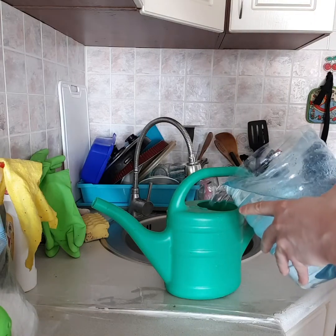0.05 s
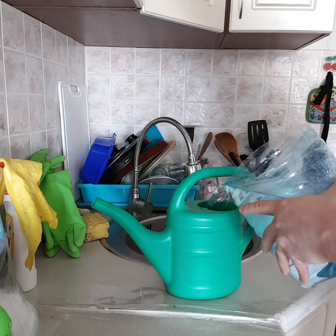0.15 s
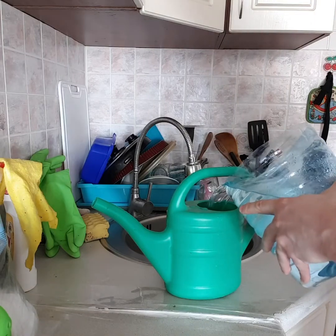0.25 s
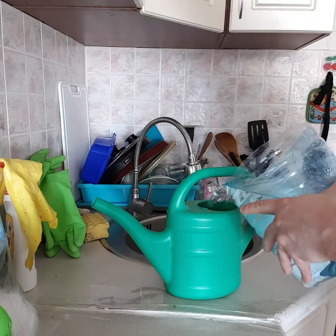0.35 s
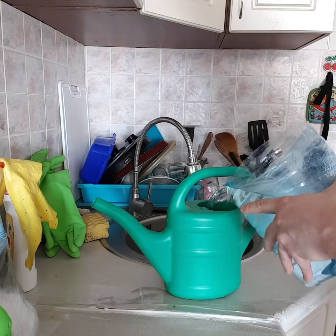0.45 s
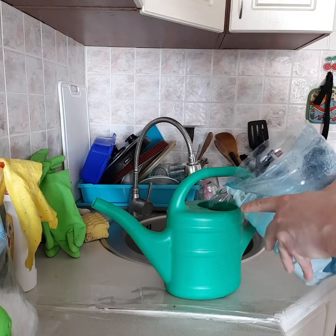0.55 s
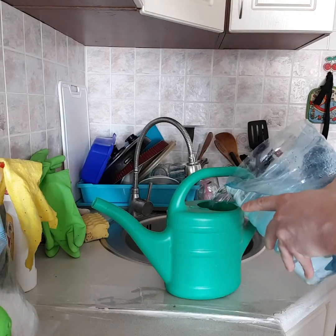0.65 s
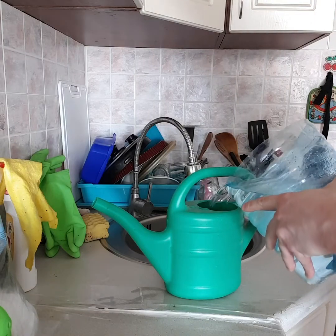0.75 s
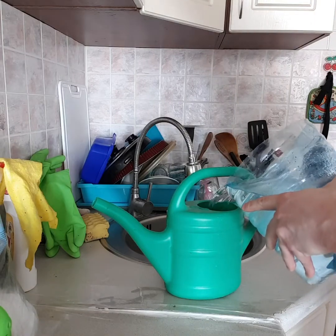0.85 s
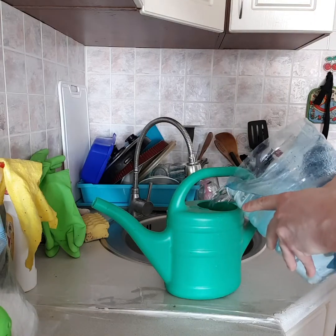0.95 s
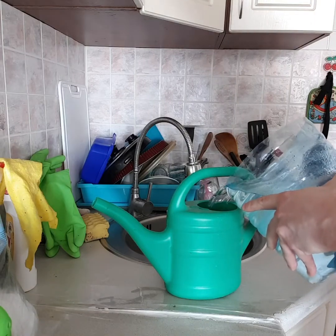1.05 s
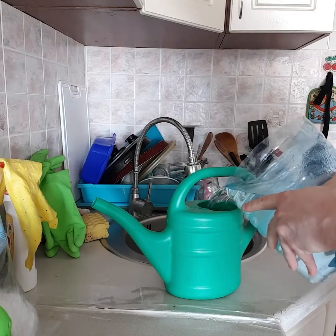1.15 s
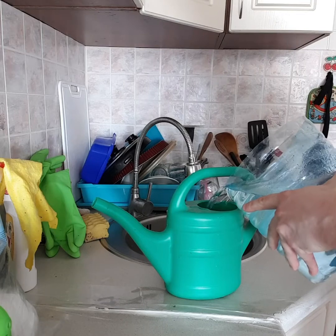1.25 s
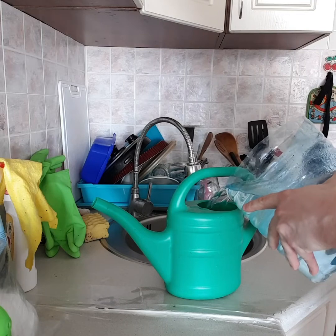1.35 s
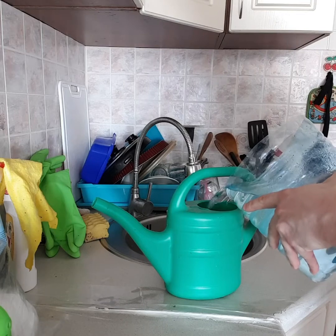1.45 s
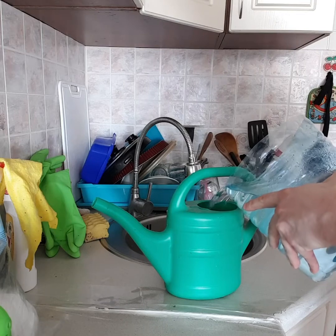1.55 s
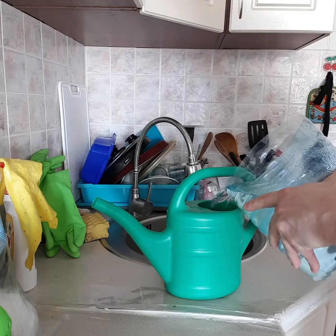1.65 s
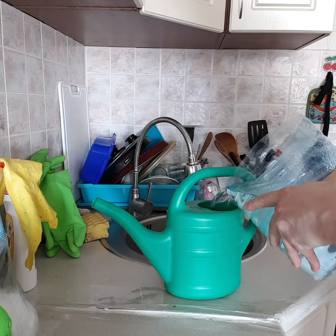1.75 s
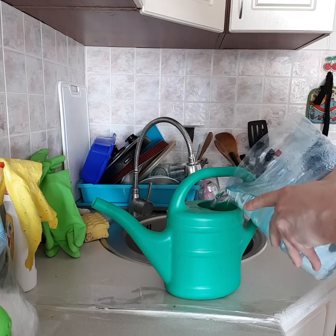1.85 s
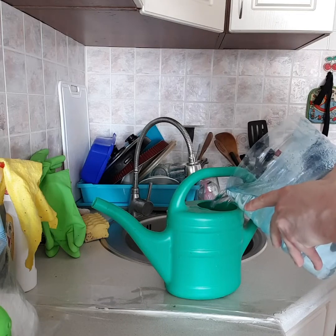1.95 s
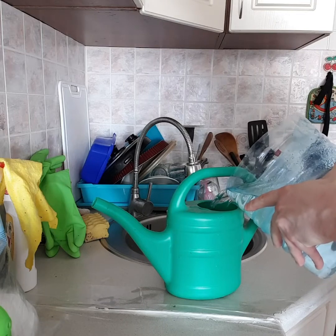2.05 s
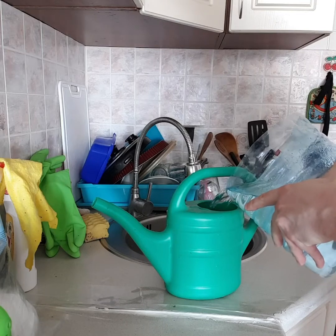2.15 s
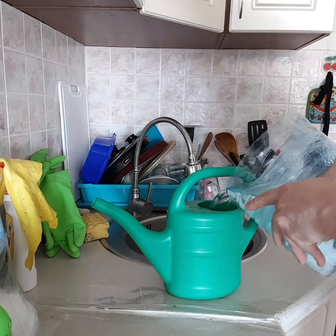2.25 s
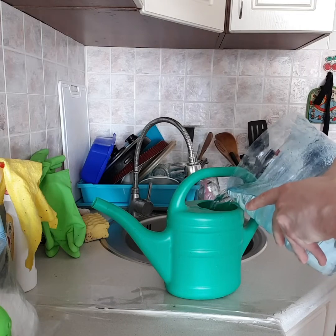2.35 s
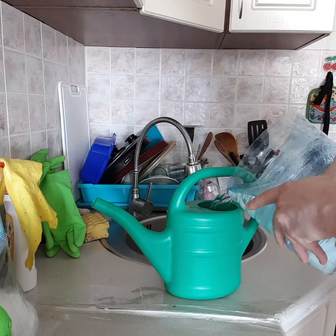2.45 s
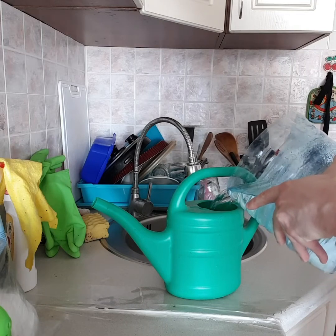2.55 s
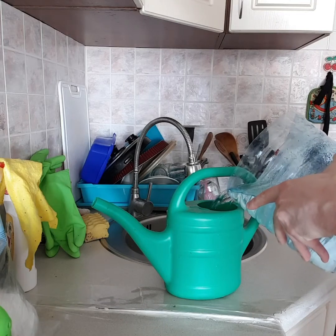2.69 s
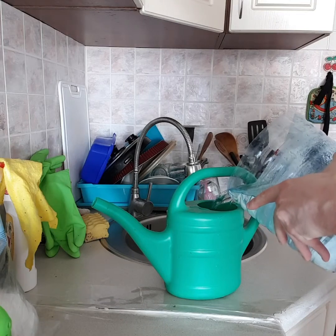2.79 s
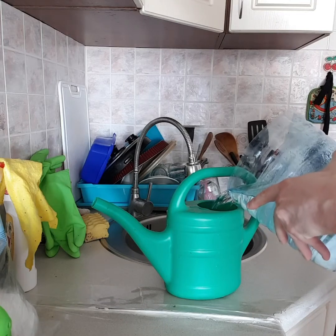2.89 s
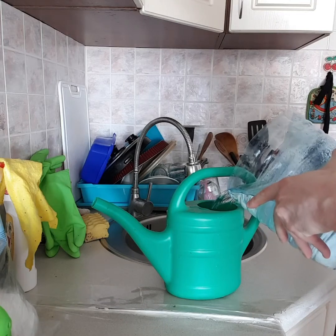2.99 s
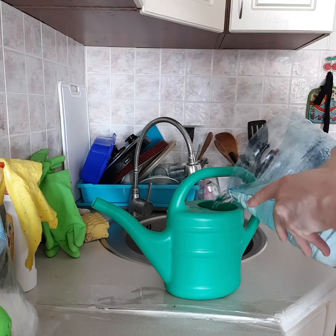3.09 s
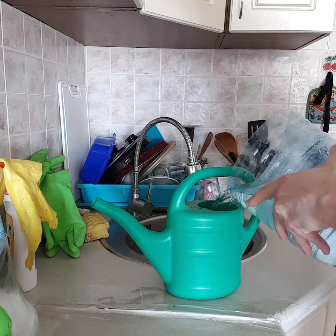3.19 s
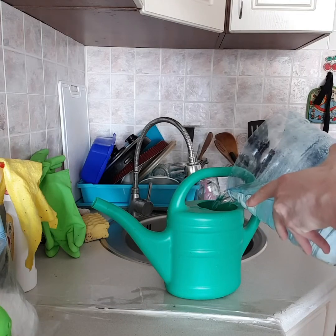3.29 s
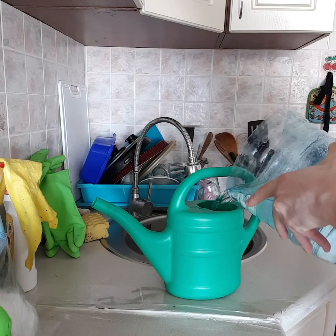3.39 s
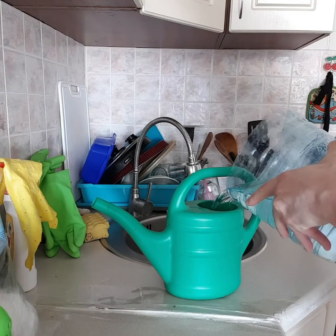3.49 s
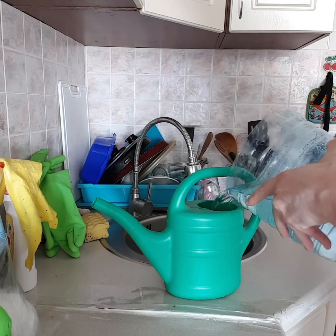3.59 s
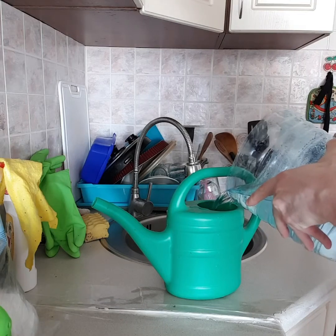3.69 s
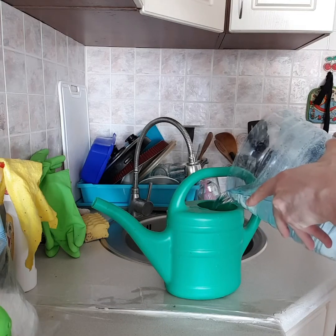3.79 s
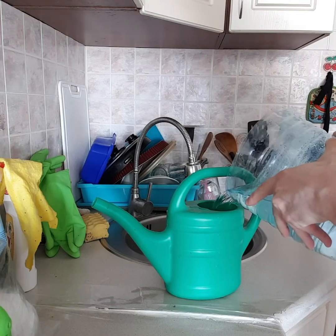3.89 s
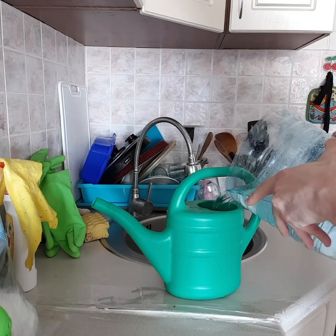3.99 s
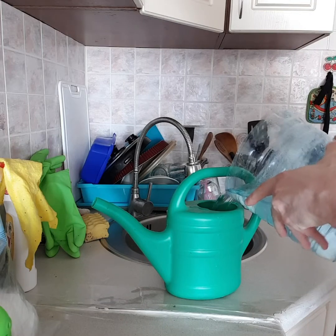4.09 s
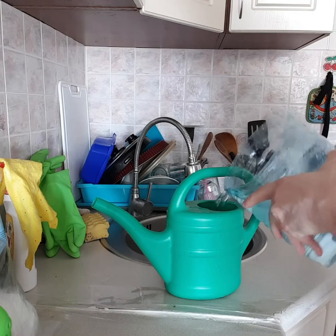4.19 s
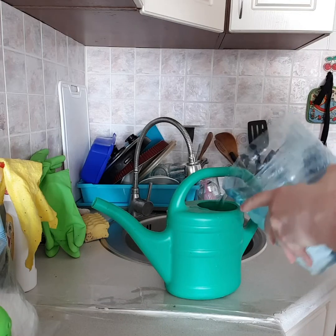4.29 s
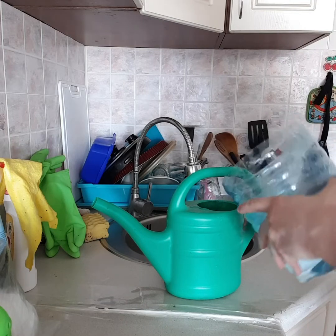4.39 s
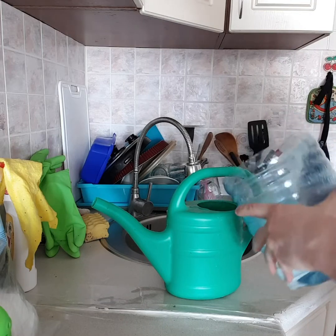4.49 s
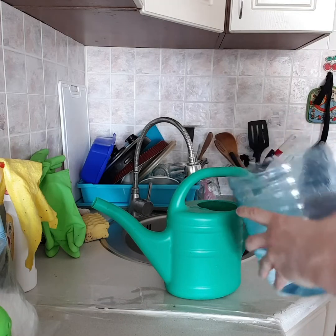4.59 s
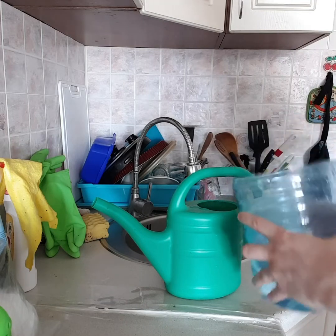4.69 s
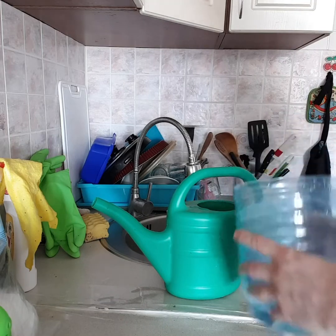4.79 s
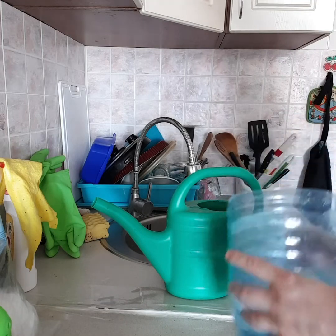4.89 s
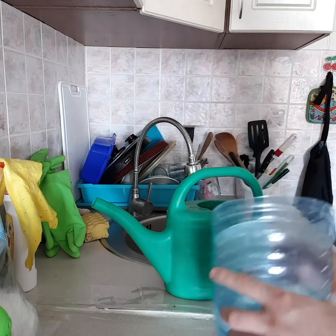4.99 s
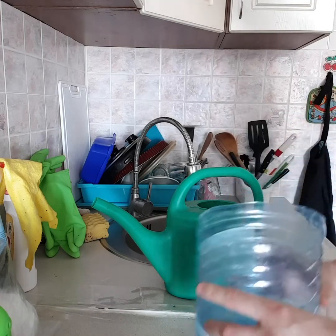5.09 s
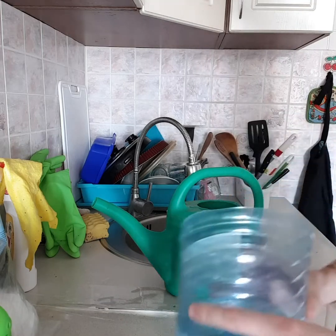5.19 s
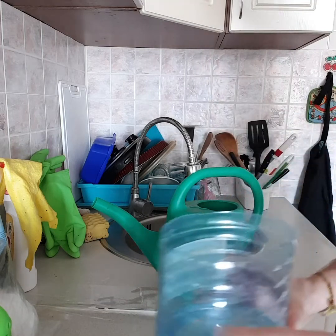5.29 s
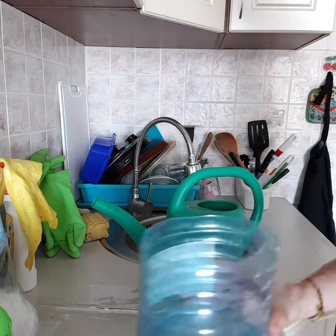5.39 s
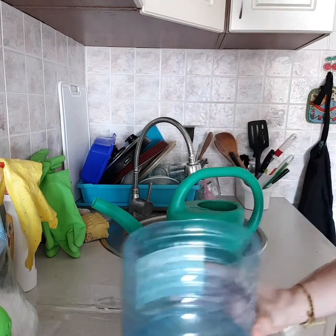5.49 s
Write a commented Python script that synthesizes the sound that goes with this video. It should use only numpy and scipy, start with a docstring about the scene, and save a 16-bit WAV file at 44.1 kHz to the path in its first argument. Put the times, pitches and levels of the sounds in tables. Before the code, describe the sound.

Close stereo sound in a small, hard tiled kitchen with a very faint hollow room tone. Water is already running from a big thin plastic bottle into a plastic watering can: lively bubbling, fine spray, plopping drops and a low hollow resonance. Dry plastic crackles snap at about 0.65 and 0.9 seconds, and a large round gulp sounds near 0.95. The stream then weakens; at about 1.46 the bottle wall pops back, sharp and loud, with small crackles around 1.6 to 1.8. From 2 to 3.2 seconds it is an uneven trickle, with separate drops splashing on water and plastic. The flow stops near 3.4. A bright, ringing drip lands at 3.75, soft lapping follows, and a faint drip comes near 4.3. At about 4.4 the bottle rubs, squeaks slightly and bumps down with a low thud, double knock and small tap. Faint plastic rustles fade after 4.6, leaving near silence.

```python
"""Filling a watering can

Water runs from a big plastic bottle into a plastic can in a tiled kitchen: noise through the can's resonances
and swarms of rising bubbles follow a flow that thins to a trickle; gulps and single drips come at set moments.
The thin bottle crackles and drops splash on plastic, both as noise bursts; the bottle's wall pops back
and it is set down with a thud, both damped modes with noise."""
import sys
import numpy as np
from scipy import signal
from scipy.fft import rfft, irfft, next_fast_len
from scipy.io import wavfile
from scipy.ndimage import map_coordinates

SR = 44100
rng = np.random.default_rng(int(sys.argv[2]) if len(sys.argv) > 2 else 0)


def dump(signal):
    """Clip the signal to [-1, 1] and save it as 16-bit WAV at the path in sys.argv[1]."""
    limited = np.clip(np.atleast_2d(signal).T, -1, 1)
    pcm = np.round(limited * 32767).astype(np.int16)
    wavfile.write(sys.argv[1], SR, pcm)


N = 244314
T = np.arange(SR // 3) / SR  # time within one short sound, s


def amp(db):
    """Decibels to gain."""
    return 10 ** (np.asarray(db) / 20)


def unit(x):
    """Scale to rms 1."""
    return x / np.sqrt(np.mean(x ** 2) + 1e-20)


def along(points, hz):
    """Read (hz, value) points on a log frequency axis."""
    point_hz, value = np.transpose(points)
    return np.interp(np.log(hz + 1), np.log(point_hz + 1), value)


def around(hz, band):
    """Move a spectrum shape to a centre frequency."""
    return [(share * hz, level_db) for share, level_db in band]


def filtered(x, response):
    """Multiply the spectrum of x by a response of frequency."""
    n = x.shape[-1]
    padded = next_fast_len(n + 8192)
    spectrum = rfft(x, padded) * response(np.fft.rfftfreq(padded, 1 / SR))
    return irfft(spectrum, padded)[..., :n]


def coloured(x, spectrum):
    """Give x a spectrum, at rms 1."""
    return unit(filtered(x, lambda hz: amp(along(spectrum, hz))))


def resonance(hz, centre_hz, width_hz):
    """Second-order bandpass, peak gain 1."""
    damping = 1j * hz * width_hz
    return damping / (centre_hz ** 2 - hz ** 2 + damping)


def resonant(x, peaks):
    """Pass x through parallel resonances, each two equal stages of twice the listed width, at rms 1."""
    def response(hz):
        return sum(amp(db) * resonance(hz, centre, 2 * width) ** 2 for centre, width, db in peaks)
    return unit(filtered(x, response))


# left-right correlation of diffuse sound: hz, correlation
LEFT_RIGHT_CORRELATION = [(100, 0.99), (250, 0.9), (500, 0.42), (900, 0.14), (2000, 0.098), (10000, .02)]


def pair(size):
    """Noise at two microphones: alike in the bass, nearly unrelated in the treble."""
    def mid_side(hz):
        half_angle = np.arccos(np.clip(along(LEFT_RIGHT_CORRELATION, hz), -1, 1)) / 2
        return np.array([np.cos(half_angle), np.sin(half_angle)])
    mid, side = filtered(rng.standard_normal((2, size)), mid_side)
    return np.array([mid + side, mid - side])


def wobble(knots_per_s):
    """Smooth random curve through random knots."""
    knots = rng.standard_normal(1024)
    return map_coordinates(knots, [np.arange(N) * knots_per_s / SR], mode="wrap")


def fade(t, t60_s):
    """Exponential decay by 60 dB in t60_s."""
    return np.exp(-np.log(1000) * t / max(t60_s, 1e-4))


def swell_at(s, sigma_s):
    """Gaussian rise and fall around time s."""
    return np.exp(-((np.arange(N) / SR - s) / sigma_s) ** 2 / 2)


def add(track, s, sound):
    """Mix a sound in at time s."""
    start = max(round(s * SR), 0)
    track[:, start:start + sound.shape[1]] += sound[:, :N - start]


# late decay of the room: hz, t60_s
ROOM_DECAY = [(100, 0.71), (500, 0.47), (2000, 0.38), (6000, 0.4), (15000, 0.43)]
RIGHT_LAG_S = 0.00017  # direct sound reaches the left microphone first


def kitchen(x, wet_db):
    """Direct sound plus a diffuse answer from tiles and cupboards: decaying noise, faster in some bands."""
    hz, t, noise = signal.stft(pair(size=SR // 2), SR, nperseg=256)
    decay = np.exp(-np.log(1000) * t / along(ROOM_DECAY, hz)[:, None])
    tail = signal.istft(noise * decay, SR, nperseg=256)[1]
    t = np.arange(tail.shape[1]) / SR
    tail *= (1 - np.exp(-t / 0.00088)) * (1 + 2 * fade(t, t60_s=0.024))  # near walls answer first and strongest
    tail *= amp(wet_db) / np.linalg.norm(tail[0])
    tail[[0, 1], [0, round(RIGHT_LAG_S * SR)]] += 1  # direct sound
    return signal.fftconvolve(x[None], tail, axes=1) / np.sqrt(1 + amp(2 * wet_db))


def burst(spectrum, t60_s, rise_s):
    """Puff of coloured noise that swells, then dies."""
    shape = (1 - np.exp(-T / max(rise_s, 1e-4))) * fade(np.maximum(T - rise_s, 0), t60_s)
    return coloured(rng.standard_normal(len(T)), spectrum) * shape


def ring(modes):
    """Damped modes struck together, with alternating sign."""
    total = np.zeros(len(T))
    for k, (hz, db, t60_s) in enumerate(modes):
        total += (-1) ** k * amp(db) * fade(T, t60_s) * np.sin(2 * np.pi * hz * T)
    return total * (1 - np.exp(-T / 0.00038))  # soft onset


def bubble(t, hz, t60_s, rise):
    """A bubble rings and its pitch climbs as it nears the surface, by the share rise in t60_s."""
    u = t / t60_s
    return np.sin(2 * np.pi * hz * t * (1 + rise * u / 2)) * np.exp(-np.log(1000) * u) * (1 - np.exp(-2 * t * hz))


def swarm(count, low_hz, high_hz, cycles, scatter_db, crowd, size=SR // 90):
    """Bubbles of random pitch, most weak and a few strong; crowd sets how thickly they come, at an even level."""
    when, pitch = rng.random(count), rng.random(count)
    strength = rng.exponential(size=count)
    start = np.searchsorted(np.cumsum(crowd), when * crowd.sum())
    hz = low_hz * (high_hz / low_hz) ** pitch[:, None]
    strength_gain = amp(scatter_db * np.minimum(strength, 3.5)) / np.sqrt(crowd[start])
    height = hz * strength_gain[:, None]  # short-lived small bubbles are taller, for even energy over pitch
    k = np.arange(size)
    grains = height * bubble(k / SR, hz, cycles / hz, rise=0.17)
    return unit(np.bincount((start[:, None] + k).ravel(), grains.ravel(), N)[:N])


# higher notes of the can's air: centre_hz, width_hz, level_db
CAN_HIGH_NOTES = [(781, 19, 2.5), (940.4, 30, 5), (1272, 12, -0.5), (1634, 69, -3.5), (1756, 26, 1.5),
                  (2316, 30, -7.5)]


def in_can(x):
    """Sound made inside the can rings its air: resonances added to the direct sound."""
    def response(hz):
        return 1 + sum(amp(db) * resonance(hz, centre, width) for centre, width, db in CAN_HIGH_NOTES)
    return filtered(x, response)


def can_mouth(x):
    """The can's hollow note reaches the right microphone later and stronger."""
    return np.array([amp(-2.0) * x, amp(2.0) * np.roll(x, round(0.00075 * SR))])


# steady hush: hz, level_db
HUSH_SPECTRUM = [(15, -40), (25, -6), (59, -2.5), (140, 2.5), (523, -17.5), (741, -13), (945, 3.5),
                 (1710, -50), (2560, -28.5), (3530, -32), (4870, -55), (5880, -39), (15500, -27.5)]
# its hollow bands: centre_hz, width_hz, level_db
HOLLOW_BANDS = [(880, 264, -5), (5400, 690, -16.5)]


def room_tone():
    """Faint steady noise with a hollow colour."""
    hush = amp(-61.0) * coloured(pair(size=N), HUSH_SPECTRUM)
    return hush + amp(-72.5) * resonant(pair(size=N), HOLLOW_BANDS)


# wall popping back, modes: hz, level_db, t60_s
WALL_MODES = [(128, -23, .25), (175, -24, .14), (484, -5, .14), (526, 1, .12), (588, -5, .12),
              (670, -11, .12), (884, -6, .2), (1400, -6, .03), (2130, -2, .04), (3020, -11, .04)]
# its crack: hz, level_db
WALL_CRACK_SPECTRUM = [(80, -23), (170, 2.5), (330, -2), (560, 4), (750, 4), (1400, 5), (2250, 1),
                       (3300, -9), (5000, -18.5), (6500, -27.5), (13000, -35)]
# bottle meeting the counter, modes: hz, level_db, t60_s
COUNTER_MODES = [(122, -3, .11), (172, 3, .11), (250, 3, .1), (365, -3, .11), (420, 3, .17), (535, -1, .12),
                 (686, -3, .12), (950, -5, .08), (1510, -9, .12)]
# its noise bump: hz, level_db
COUNTER_BUMP_SPECTRUM = [(60, -22), (120, -8), (400, -1), (600, -4), (950, -4), (1600, -9), (2300, -16),
                         (3000, -36), (6000, -50)]
# bumps of the bottle: start_s, level_db
BOTTLE_BUMPS = [(1.819, -57.5), (4.4198, -37.5), (4.4405, -44.5), (4.498, -51.5), (4.869, -64.5)]
# bottle's side tapping something just after the thud, modes: hz, level_db, t60_s
TAP_MODES = [(455, 1, .25), (1570, 3, .09), (1800, 0, .08), (4230, -4, .02), (5200, -5, .025)]
# wet plastic slipping just before the thud: centre_hz, width_hz, level_db
SQUEAK_BAND = [(4872, 170, 0)]
# bottle sliding in the hand as it is carried off: centre_hz, width_hz, level_db
SCUFF_BAND = [(4640, 880, 0)]
POP_S, TAP_S, TAP_DB = 1.4632, 4.4815, -41
SQUEAK_S, SQUEAK_SIGMA_S, SQUEAK_DB = 4.414, 0.018, -61.5
SCUFF_S, SCUFF_SIGMA_S, SCUFF_DB = 4.95, 0.23, -76


def bottle():
    """Damped modes for wall pop, thuds and tap, with noise in pop and thuds; squeak and scuff are noise swells."""
    out = np.zeros((2, N))
    note = amp(-27.5) * kitchen(ring(WALL_MODES), wet_db=-3)
    crack = amp(-19.0) * kitchen(burst(WALL_CRACK_SPECTRUM, t60_s=0.032, rise_s=0.0006), wet_db=1)
    add(out, POP_S, (note + crack) * amp([[1.5], [-1.5]]))  # leans left
    for start_s, level_db in BOTTLE_BUMPS:
        body = kitchen(ring(COUNTER_MODES), wet_db=-5)
        bump = amp(6.5) * kitchen(burst(COUNTER_BUMP_SPECTRUM, t60_s=0.1, rise_s=0), wet_db=-1)
        add(out, start_s, amp(level_db) * (body + bump))
    add(out, TAP_S, amp(TAP_DB) * kitchen(ring(TAP_MODES), wet_db=2))
    squeak = swell_at(SQUEAK_S, SQUEAK_SIGMA_S) * resonant(pair(size=N), SQUEAK_BAND)
    scuff = swell_at(SCUFF_S, SCUFF_SIGMA_S) * resonant(pair(size=N), SCUFF_BAND)
    return out + amp(SQUEAK_DB) * squeak + amp(SCUFF_DB) * scuff


# dry snap, also the tick of a drip: share_of_centre, level_db
SNAP_BAND = [(.3, -24), (.65, -14), (.88, -5), (1.001, 1), (1.14, -4.5), (1.499, -13), (3, -35)]
# duller body under a snap: hz, level_db
SNAP_BODY_SPECTRUM = [(100, -16), (450, 1.5), (800, 5.5), (1700, 5), (2800, 3.5), (5000, -19)]


def plastic_snap(centre_hz, body_db, rise_s):
    """A crease moves or a drop hits plastic: a dry noise snap, and a duller body that rings the can's air."""
    snap = burst(around(centre_hz, SNAP_BAND), t60_s=0.02, rise_s=rise_s)
    body = in_can(burst(SNAP_BODY_SPECTRUM, t60_s=0.06, rise_s=rise_s))
    return amp(-2.0) * kitchen(snap + amp(body_db) * body, wet_db=8.5)


# crackles of the bottle and, from 2.13 to 2.79 s, splashes of drops on the plastic:
# start_s, level_db, centre_hz, body_db
CRACKLES_AND_SPLASHES = [(0.6503, -25, 4950, -9), (0.7758, -34.5, 14000, -8), (.8895, -27, 5400, -13),
                         (1.2525, -37, 5760, -9), (1.64, -34.5, 6940, -2), (1.793, -30, 6000, -13.5),
                         (1.815, -37, 11000, -17), (2.1318, -39.5, 4900, 1.5), (2.2073, -42, 5150, -8),
                         (2.4366, -47, 4050, -20), (2.5343, -40.5, 4830, -14), (2.7835, -37, 4580, 2.5),
                         (2.993, -45, 6350, -15), (3.5435, -49.5, 8500, -13.5), (4.48, -38, 5850, -8),
                         (4.499, -41, 13000, -19)]
# bottle brushing past the can and the hand: start_s, level_db, body_db
BOTTLE_RUBS = [(4.404, -47.5, 0.5), (4.616, -51, 2.5), (4.82, -57, -3), (5.17, -58, -1.5)]
SNAP_RISE_S = 0.0015
RUB_HZ, RUB_RISE_S = 4900, 0.013


def crackles_and_splashes():
    """Creases of the thin bottle and drops on plastic snap drily; rubs rustle with a slower rise."""
    out = np.zeros((2, N))
    for start_s, level_db, centre_hz, body_db in CRACKLES_AND_SPLASHES:
        add(out, start_s, amp(level_db) * plastic_snap(centre_hz, body_db, SNAP_RISE_S))
    for start_s, level_db, body_db in BOTTLE_RUBS:
        add(out, start_s, amp(level_db) * plastic_snap(RUB_HZ, body_db, RUB_RISE_S))
    return out


# lapping water: hz, level_db
RIPPLE_SPECTRUM = [(1000, -16), (1900, 5), (3000, -15.5), (5500, -14)]
RIPPLE_S, RIPPLE_SIGMA_S, RIPPLE_DB = 3.932, 0.082, -64.5


def ripple():
    """The water laps softly between drips: a swell of tiny bubbles."""
    tiny = swarm(count=3000, low_hz=1200, high_hz=5000, cycles=30, scatter_db=4.0, crowd=np.ones(N))
    lap = swell_at(RIPPLE_S, RIPPLE_SIGMA_S) * coloured(tiny, RIPPLE_SPECTRUM)
    return amp(RIPPLE_DB) * kitchen(lap, wet_db=-4.5)[:, :N]


# last drips into still water: start_s, level_db, start_pitch_hz, t60_s, tick_db (relative)
LAST_DRIPS = [(3.475, -55, 2566, 0.037, -20), (3.754, -41, 3001, 0.075, 6),
              (4.2837, -55.5, 1980, 0.056, -19)]
DRIP_TICK_HZ = 5870


def drips():
    """A last drip ticks on still water and its bubble rings on, climbing a little."""
    out = np.zeros((2, N))
    for start_s, level_db, pitch_hz, t60_s, tick_db in LAST_DRIPS:
        plip = bubble(T, pitch_hz, t60_s, rise=0.02)
        add(out, start_s, amp(level_db) * kitchen(plip, wet_db=5))
        tick = burst(around(DRIP_TICK_HZ, SNAP_BAND), t60_s=0.0065, rise_s=SNAP_RISE_S)
        add(out, start_s, amp(level_db + tick_db) * kitchen(tick, wet_db=5))
    return out


# pour swelling, thinning and stopping: time_s, flow_db (against the full stream)
POUR_FLOW = [(0, -1), (.15, -2.5), (.3, -.5), (.72, 0), (.9, -3), (1.42, -10), (1.72, -10), (2.0, -16.5),
             (2.2, -14.5), (2.42, -24.5), (2.58, -18.5), (2.76, -21), (2.98, -29), (3.2, -22.5), (3.4, -54)]
DRAIN_DB_PER_S = 34  # the last film of water runs out


def flow_db(t):
    """Flow at time t; it dies away steadily after the last point."""
    time_s, db = np.transpose(POUR_FLOW)
    return np.interp(t, time_s, db) - DRAIN_DB_PER_S * np.maximum(t - time_s[-1], 0)


# loud drops, some with extra rows for the can's notes ringing on: start_s, level_db, start_pitch_hz
LOUD_DROPS = [(0.225, -28.5, 1560), (.269, -37, 725), (.347, -27.5, 1820), (.478, -32, 1500),
              (.504, -29, 1380), (.561, -31.5, 1610), (.597, -30, 2620), (0.732, -28.5, 1760),
              (.888, -26.5, 1686), (1.128, -40, 1280), (1.7615, -37, 2520), (2.0244, -36, 2520),
              (2.034, -41, 1670), (2.046, -44.5, 970), (2.069, -41.5, 1720), (2.5658, -47.5, 2700),
              (2.611, -48.5, 1750), (2.803, -41, 1720), (2.8625, -39.5, 2260), (2.866, -47.5, 920),
              (2.948, -49, 1900), (3.0291, -45.5, 1890), (3.096, -47.5, 2340), (3.121, -43, 2820),
              (3.124, -45.5, 1300), (3.1728, -44, 1930), (3.2165, -48.5, 1520)]
# splash of a drop: share_of_pitch, level_db
DROP_SPLASH_BAND = [(.35, 4), (1, 24), (1.75, 10), (2.8, -15), (4.5, -22)]
# churned water cushions a drop: flow_db, splash_db (against the ringing tone)
CUSHIONED_SPLASH = [(-14, -0.5), (-0.5, -4)]


def drops():
    """Drops splash and leave short rising tones, of bubbles or the can; a thinner stream splashes more."""
    out = np.zeros((2, N))
    for start_s, level_db, pitch_hz in LOUD_DROPS:
        plip = bubble(T, pitch_hz, t60_s=0.022, rise=0.12)
        splash = burst(around(pitch_hz, DROP_SPLASH_BAND), t60_s=0.028, rise_s=0.0025)
        splash_db = np.interp(flow_db(start_s), *np.transpose(CUSHIONED_SPLASH))
        add(out, start_s, amp(level_db) * kitchen(plip + amp(splash_db) * splash, wet_db=2))
    return in_can(out)


# plunges of large air pockets: start_s, level_db, settled_pitch_hz, t60_s, can_air_db, can_base_db (relative)
AIR_GULPS = [(0.292, -27.5, 733, 0.033, -29, -6), (0.9552, -21, 867.5, 0.14, 2.5, -12)]
# splash of a plunge: hz, level_db
PLUNGE_SPECTRUM = [(150, -9), (450, -4), (700, -3), (950, 3), (1100, -11.5), (1280, -3), (1700, -11.5),
                   (12000, -32)]


def gulps():
    """A large pocket of air rings under water and shakes the can's air and base."""
    out = np.zeros((2, N))
    swell = 1 - np.exp(-T / 0.021)
    glide = 1 - 0.18 * np.exp(-T / 0.0056)  # the pitch climbs as the pocket closes, then holds
    for start_s, level_db, pitch_hz, t60_s, air_db, base_db in AIR_GULPS:
        pocket = np.sin(2 * np.pi * pitch_hz * np.cumsum(glide) / SR) * fade(T, t60_s)
        plunge = in_can(burst(PLUNGE_SPECTRUM, t60_s=0.087, rise_s=0.00098))
        add(out, start_s, amp(level_db) * kitchen(pocket + amp(-7.5) * plunge, wet_db=-1.0))
        air = can_mouth(amp(air_db) * swell * ring([(CAN_AIR_NOTE[0][0], 0, 0.2)]))
        base = amp(base_db) * swell * ring([(CAN_BASE_NOTE[0][0], 0, 0.25)])
        add(out, start_s, amp(level_db) * (air + base))
    return out


# can's base: centre_hz, width_hz, level_db
CAN_BASE_NOTE = [(95.4, 39, 0)]
# can's air: centre_hz, width_hz, level_db
CAN_AIR_NOTE = [(338.4, 23.3, 0)]
# bubbling water: hz, level_db
SPLASH_SPECTRUM = [(260, -56), (450, -8.5), (780, -9.5), (1300, -8.5), (1750, -3.5), (2400, -6),
                   (3800, -9.5), (5000, -13), (5700, -11.5), (7000, -21), (9500, -4)]
# fine spray: hz, level_db
SPRAY_SPECTRUM = [(2500, -9.5), (4800, -13.5), (6000, -3.5), (7300, -11), (15500, -11)]
# levels at 0 dB flow, and growth in dB per dB of flow
DRUM_DB, HOLLOW_DB, BUBBLING_DB, SPRAY_DB, GURGLE_DB = -50.5, -50.5, -45.5, -47.5, -51
DRUM_GROWS, HOLLOW_GROWS, BUBBLING_GROWS, SPRAY_GROWS, GURGLE_GROWS = 1.25, 1.78, 0.8, 1.7, 1.4
HOLLOW_LAG_S = 0.52  # the churning that stirs the can's air outlasts the jet
CHURN_DB, CHURN_KNOTS_PER_S = 1.8, 35  # the jet drags air under in uneven clumps
FEWEST_BUBBLES = 0.15  # rate in a trickle, share of the full stream's
LEAD_IN = SR // 10  # samples; the water is already running at the start


def stream():
    """The jet drums on the can's base, stirs its air, and throws bubbles and spray; all follow the flow."""
    t = np.arange(N) / SR
    flow = flow_db(t)
    drum = amp(DRUM_DB + DRUM_GROWS * flow)
    hollow = amp(HOLLOW_DB + HOLLOW_GROWS * flow_db(t - HOLLOW_LAG_S) + 3.2 * wobble(11.91))
    bubbling = amp(BUBBLING_DB + BUBBLING_GROWS * flow + CHURN_DB * wobble(CHURN_KNOTS_PER_S))
    spray = amp(SPRAY_DB + SPRAY_GROWS * flow)
    gurgling = amp(GURGLE_DB + GURGLE_GROWS * flow)

    base = drum * resonant(pair(size=N), CAN_BASE_NOTE)
    air = can_mouth(hollow * resonant(rng.standard_normal(N), CAN_AIR_NOTE))

    crowd = np.maximum(amp(flow), FEWEST_BUBBLES)  # more water, more bubbles
    bubbles = swarm(count=3600, low_hz=550, high_hz=7000, cycles=18, scatter_db=5, crowd=crowd, size=SR // 50)
    gurgle = swarm(count=450, low_hz=230, high_hz=950, cycles=14, scatter_db=3, crowd=crowd, size=SR // 16)
    fizz = swarm(count=3000, low_hz=3600, high_hz=13000, cycles=8.4, scatter_db=4, crowd=crowd)
    water = in_can(bubbling * coloured(bubbles, SPLASH_SPECTRUM) + gurgling * gurgle)
    water = water + spray * coloured(fizz, SPRAY_SPECTRUM)
    running = np.pad(water, (LEAD_IN, 0), mode="reflect")
    return base + air + kitchen(running, wet_db=5.5)[:, LEAD_IN:LEAD_IN + N]


def scene():
    """Sum of all the sources."""
    background = room_tone() + bottle() + crackles_and_splashes()
    return background + ripple() + drips() + drops() + gulps() + stream()


# the two microphones: hz, left_minus_right_db
LEFT_RIGHT_LEAN = [(100, 2), (220, -2), (340, -4), (520, 11), (730, 0), (950, -6), (1280, 5.5), (1600, 1.5),
                   (2400, 6), (4200, 9.5), (5100, 18), (6000, 5.5), (8500, -0.5), (13000, 5)]
# common resonance of the microphone ports: hz, level_db
PORT_RESONANCE = [(3900, -1), (5150, 4), (5700, -10), (6800, -1.5)]
TOP_HZ = 15600


def record(dry):
    """Each microphone has its own colour; nothing passes above the band limit."""
    def microphones(hz):
        gains = amp(along(LEFT_RIGHT_LEAN, hz) * np.array([[0.5], [-0.5]]))
        balanced = gains / gains.mean(axis=0)
        return balanced * amp(along(PORT_RESONANCE, hz)) * (hz < TOP_HZ)
    return filtered(dry, microphones)


dry = scene()
out = record(dry)
dump(out)
```